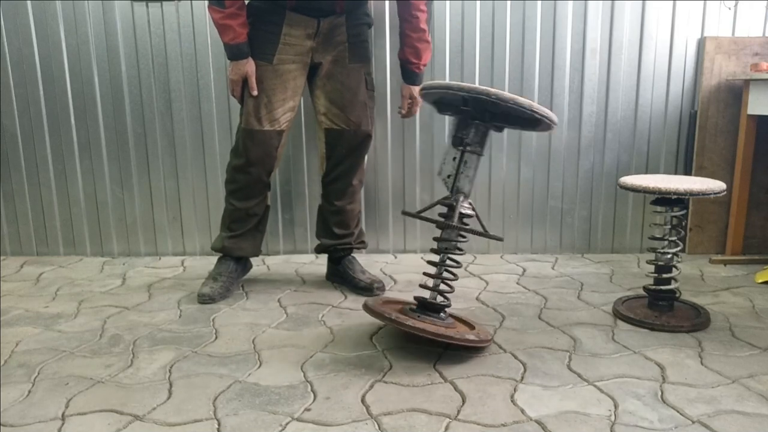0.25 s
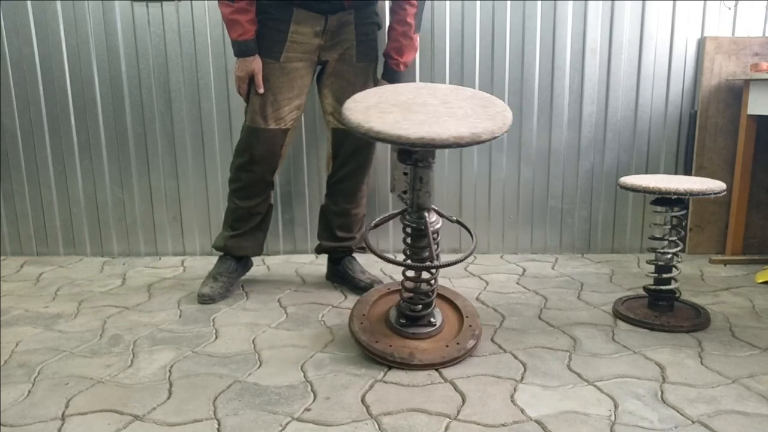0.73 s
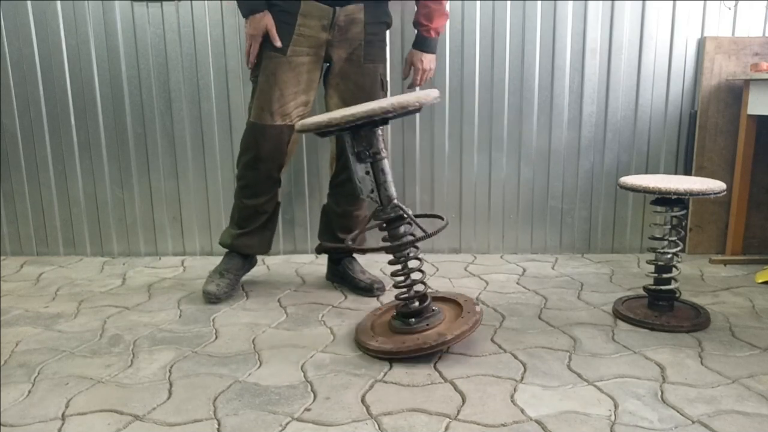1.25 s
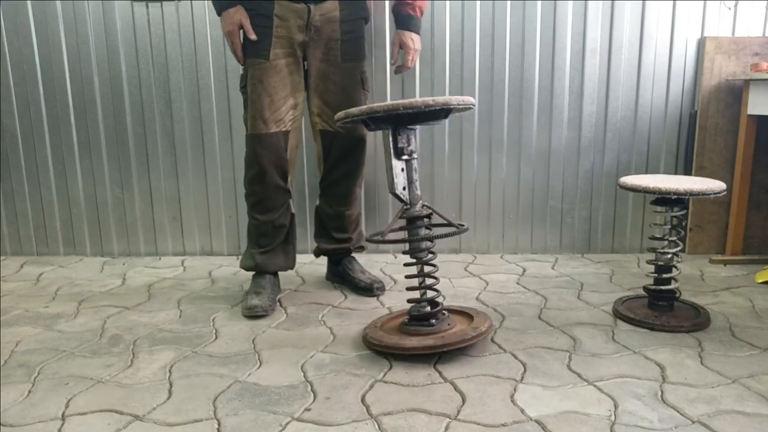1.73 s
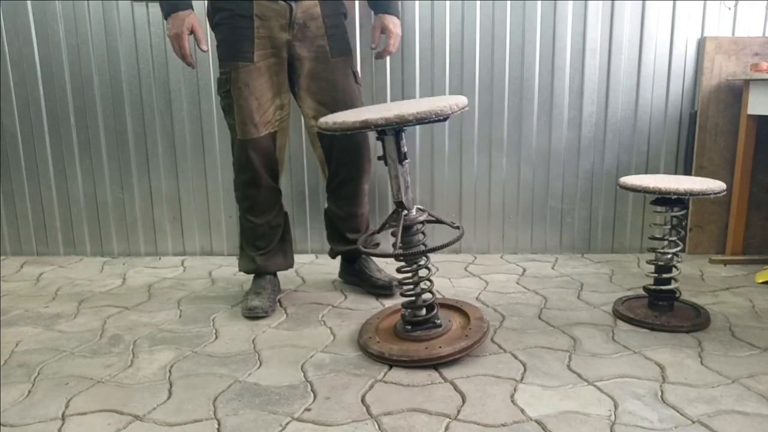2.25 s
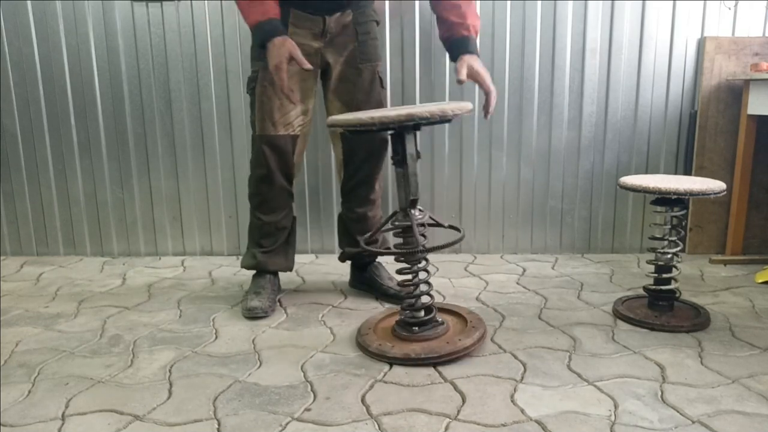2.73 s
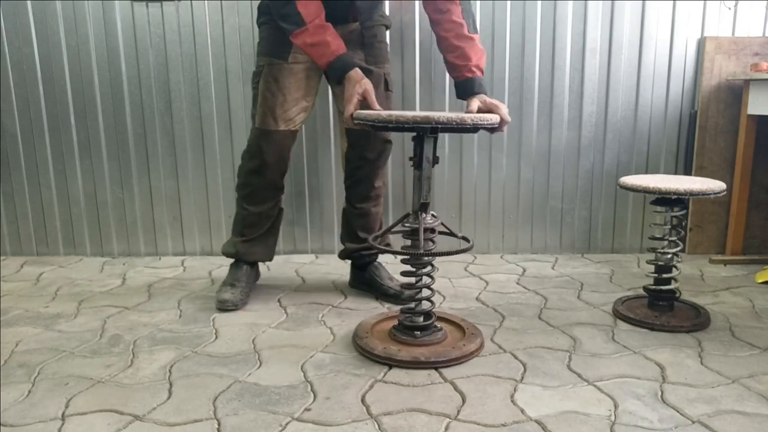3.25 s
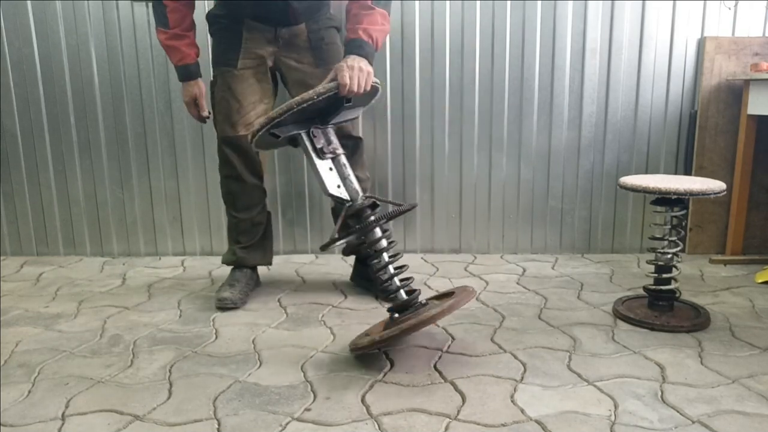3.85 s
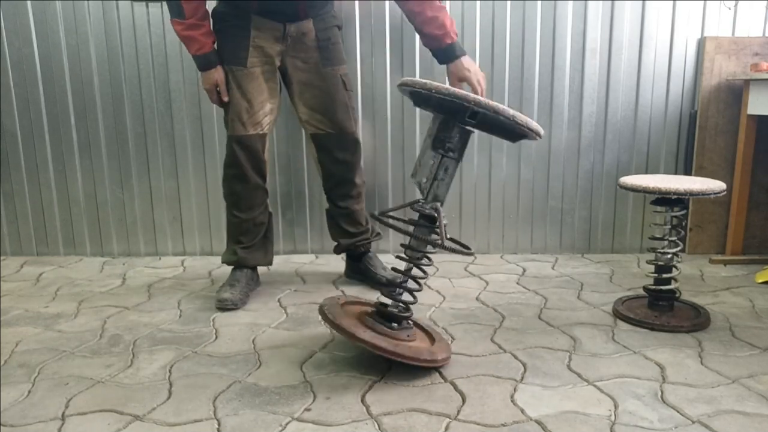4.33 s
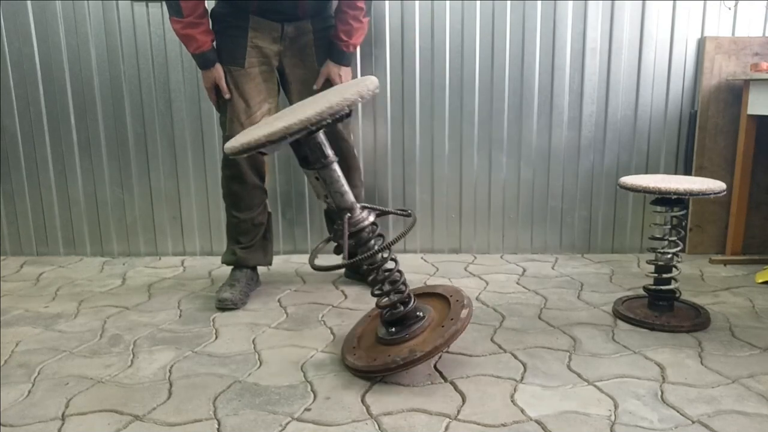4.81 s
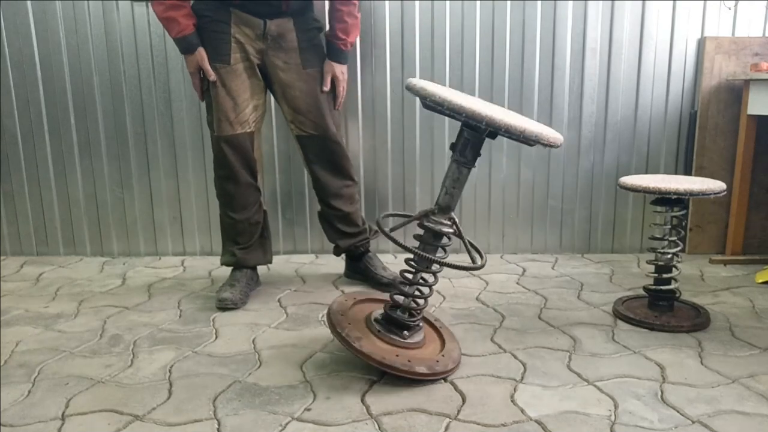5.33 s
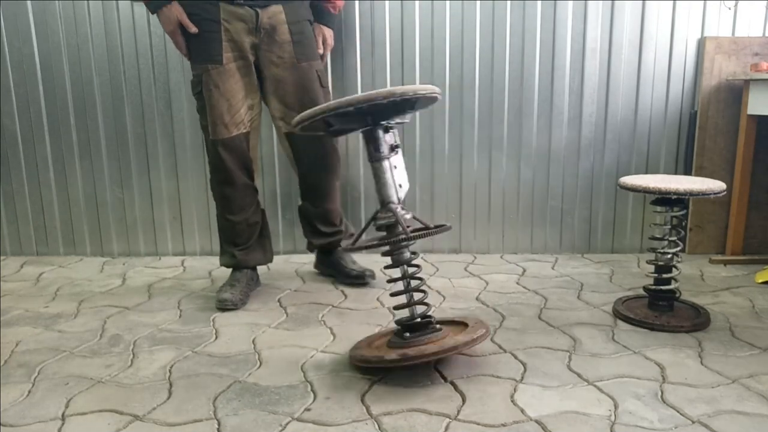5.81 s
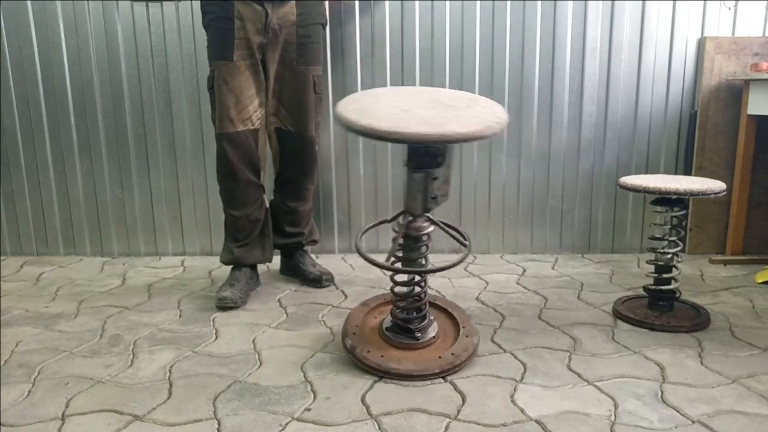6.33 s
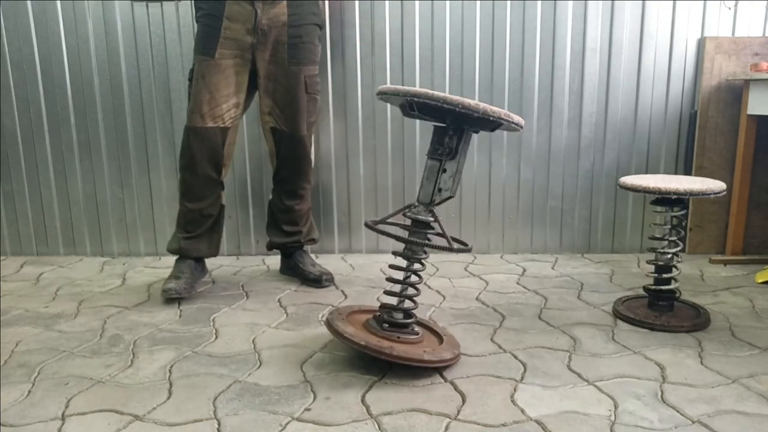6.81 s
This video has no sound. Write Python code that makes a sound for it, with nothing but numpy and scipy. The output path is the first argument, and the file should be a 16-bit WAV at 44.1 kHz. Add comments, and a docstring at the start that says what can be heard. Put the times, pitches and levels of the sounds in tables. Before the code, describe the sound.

Steel rim on stone in a hard, echoing yard: irregular clanks and rapid stuttering bounces over grinding rolls. Around the middle there is a strong rumble, bright ringing knocks, then a brief quieter gap with gritty drags and spring clinks. The wobbling resumes with duller, hollow thuds and softer rolling to the end. Close, single-channel pickup, with crisp stony cracks over a thick tail and very faint ambient noise.

```python
"""A paved yard with sheet-metal walls: a tall stool on a rusty steel disc is tipped and wobbles on its rim.
The rim rumbles over rough concrete pavers, knocks at the joints and drags sand; the coil spring above clinks.
Bumps and blows are noise grains and clicks sent through the steel's resonances; blows also ping decaying sines.
The yard, a dense tail that shifts as the contact circles, holds the sound for most of a second.
Some clacks, clinks and pings reach the microphone straight, over a faint far background of filtered noise."""
import sys
import numpy as np
from scipy import signal
from scipy.fft import rfft, irfft, next_fast_len
from scipy.io import wavfile
from scipy.ndimage import uniform_filter1d, minimum_filter1d

SR = 44100
rng = np.random.default_rng(int(sys.argv[2]) if len(sys.argv) > 2 else 0)


def waveform_to_disk(signal):
    """Save audio, clipped to [-1, 1], as 16-bit WAV at the path in sys.argv[1]."""
    frames = np.transpose(np.atleast_2d(signal))
    scaled = np.clip(frames, -1, 1) * 32767
    samples = np.round(scaled).astype(np.int16)
    wavfile.write(sys.argv[1], SR, samples)


N = 311346

# The rim drops into a joint once. Each row: start in seconds, force in dB, hardness in dB per octave,
# peak height of the stony crack (linear, 0-2), ring in dB before the mix.
JOINT_KNOCKS = [(0.003, -13.5, -0.5, 0, -43), (0.355, -22.5, -2, 0, -52.5), (0.433, -11.5, 1.3, 0.7, -50),
                (0.479, -13, 4, 1.5, -26.5), (0.553, -8.5, 3, 0, -28.5), (1.11, -24, 7.5, 1, -42),
                (1.16, -13.5, 5, 0, -46), (1.225, -11.5, -0.5, 0, -50), (1.6, -19, 4.5, 0.96, -21.5),
                (1.7, -20, 5.5, 0.19, -38), (1.991, -15.5, 3.5, 0.3, -36.5), (2.231, -13, 6, 0.84, -32.5),
                (2.257, -11.5, -0.5, 1.2, -46), (2.32, -10, 2.4, 1.4, -42), (2.585, -14, 8.5, 0, -27.5),
                (2.688, -28, -1, 0.51, -35), (3.082, -21, 7.5, 0.46, -30), (3.368, -15, -6.5, 0.44, -39),
                (3.377, -13, 9, 0.26, -19.5), (3.44, -34, 11.5, 0, -40), (3.497, -30.5, 13, 0.11, -53),
                (3.956, -39, -12, 0.022, -62), (4.117, -29, -8.5, 0, -54), (4.44, -20.5, -4.5, 0, -63),
                (4.692, -12, -2, 0.1, -33.5), (4.745, -18, -11, 0.22, -46), (4.997, -25, -7.5, 0, -50),
                (5.157, -23.5, 0.5, 0.054, -42), (5.227, -14, -6, 0.33, -45), (5.328, -18, 0, 0, -52.5),
                (5.432, -9.5, -2.5, 0.38, -44), (5.635, -14, -5.5, 0.13, -37),
                (5.893, -19.5, 4, 0.011, -37.5), (6.181, -27.5, 2, 0.23, -50),
                (6.399, -18, -3.5, 0.22, -55), (6.577, -23.5, -5, 0, -68), (6.685, -26.5, -1.5, 0.16, -49),
                (6.767, -20, -6.5, 0.2, -49), (6.952, -24, 2.5, 0, -50), (6.989, -19, -2.5, 0.084, -50),
                (7.031, -15.5, 0.5, 0.0044, -35)]
# The rim trips on a joint and strikes three times. Each row: first strike in seconds, force in dB,
# hardness in dB per octave, peak height of the stony crack (linear, 0-2), ring in dB before the mix.
JOINT_CLATTERS = [(0.918, -10.5, 3, 0.05, -33), (1.49, -9.5, 2.5, 0.34, -34),
                  (2.542, -13.5, -0.5, 0.092, -39), (2.974, -15.5, 0, 0.3, -35), (5.948, -16, 0, 0.91, -46)]
# The rim runs over the stone, swelling and fading.
# Each row: peak in seconds, force in dB, half-length in seconds.
ROLLING_RUNS = [(0.02, -21.5, 0.053), (0.62, -14, 0.068), (1.03, -15.5, 0.076), (1.29, -15.5, .12),
                (1.87, -16, 0.1), (2.35, -20, .1), (2.87, -11, 0.18), (3.07, -19, 0.05), (3.5, -31.5, 0.16),
                (4.55, -23.5, 0.091), (4.83, -30.5, 0.25), (5.4, -20.5, 0.06), (5.68, -16.5, 0.11),
                (6.07, -22, 0.13), (6.42, -23, 0.25), (7.04, -19.5, 0.089)]
# Hardness of the rolling contact: bright while the stool wobbles nearly upright, dull once it leans far.
# Each row: time in seconds, hardness in dB per octave.
ROLLING_HARDNESS = [(0, 1.5), (1.3, 3.5), (1.9, -2), (2.35, 6.5), (2.9, 1), (3.15, 8), (3.9, -4), (5.7, -5),
                    (6.1, 1), (6.5, -11), (7.05, -5.5)]
# The rim slides and drags sand. Each row: peak in seconds, level in dB before the mix, half-length in seconds.
SAND_SWISHES = [(0.56, -48, 0.073), (1.25, -39.5, 0.25), (2.33, -43.5, 0.06), (2.95, -38.5, 0.24),
                (3.42, -38, 0.058), (4.125, -28.5, 0.053), (4.63, -37, 0.14), (5.66, -38.5, 0.073),
                (6.51, -32, 0.14)]
# The spring touches its post. Each row: start in seconds, level in dB before the mix.
SPRING_CLINKS = [(1.803, -49), (2.262, -44), (3.355, -47.5), (3.835, -51), (4.064, -56), (4.14, -40.5),
                 (4.212, -34.5), (5.159, -40.5), (5.432, -38), (5.948, -41)]
# The disc's purest modes, pinged by every blow. Each row: frequency in Hz, level in dB relative to the ring.
DISC_PINGS = [(1700, 0), (2620, 1), (3990, -17), (4650, -23.5)]
# Resonances of disc and frame. Each row: frequency in Hz, width in Hz, full lift in dB.
STEEL_MODES = [(106, 9.3, 0), (205.5, 23, 4), (276.4, 22, 3.5), (391, 19, -1.5), (450.7, 34.5, 11.5),
               (490.9, 17.7, 11), (543.4, 39, 5.5), (645.4, 27.4, 9), (876.5, 207, 8.5), (982, 62, 4.5),
               (1106, 26, -1.5), (1285, 72, -1), (1594, 216, 5.5), (1650, 460, 4.5), (2556, 120, 9.5),
               (2625, 60, 12.5), (2736, 94, 10.5), (3944, 130, 12), (4600, 60, 2), (4590, 54, 9),
               (5605, 89, 13.5), (6730, 320, 12), (7350, 200, 16), (9040, 390, 4), (13200, 300, -0.5),
               (14900, 200, 13.5)]
# Broad colour of rim on stone. Each row: frequency in Hz, relative level in dB per Hz.
RIM_COLOUR = [(25, -45), (48, -38), (70, -17), (100, -5.5), (200, -3), (400, 4.5), (600, 0), (750, -3.5),
              (1100, -2.5), (1380, -13), (1800, -13), (2250, -28.5), (3100, -35.5), (4500, -39),
              (5300, -54), (9000, -75), (16000, -103.5)]
# Broad colour shared by sand and spring. Each row: frequency in Hz, relative level in dB per Hz.
SAND_COLOUR = [(60, -30.5), (400, -11), (1400, 7.5), (2500, -1.5), (3300, 5), (4600, 4), (5300, -5.5),
               (6400, 2), (7500, 0), (8400, -4), (8800, -24.5), (11000, -26), (12200, -12), (16000, -17)]
# Ring-on of steel and yard. Each row: frequency in Hz, seconds to fall 60 dB.
YARD_RING_ON = [(80, 1), (210, 0.59), (560, 0.59), (1500, 0.78), (2600, 0.84), (4000, 0.36), (10000, 0.44),
                (16000, 0.87)]
# Colour of the far background. Each row: frequency in Hz, relative level in dB per Hz.
BACKGROUND_COLOUR = [(20, -17.5), (60, -5), (110, 7), (300, 4), (1000, -10), (4000, -21.5), (16000, -46.5)]

CREEP_DB = -44  # force of the rim between runs
SWELL_DROP_DB = 4.5  # fall of a run or a swish one half-length from its peak
HINGE_HZ, BASS_TILT_SHARE = 600, 0.43  # hardness tilts about the hinge, with this share of its slope below it
BOUNCE_S, BOUNCE_LOSS_DB, BOUNCE_HARDENS = .0445, 0.84, 1.94  # per strike: gap, dB lost, dB per octave gained
CRACK_HZ, CRACK_T60_S = 1040, .007
SAND_UNDER_RIM_DB, SAND_CREEP_DB = -27.5, -52  # before the mix: relative to the rolling force; constant part
PING_SCATTER = .015  # standard deviation of the disc's pitch from blow to blow, as a share
# The spring's thud: dB relative to the force, and dB gained per dB-per-octave of softness.
THUD_HZ, THUD_DB, THUD_PER_SOFTNESS = 103.3, -26.5, 1.72
SPRING_DIRECT_DB = -7.5  # the clink heard straight, without the yard
WOBBLES_PER_S = 1.3
CUTOFF_HZ = 15800


def rim(force_db, hardness):
    """Rolling bumps and knocks drive the disc; a harder contact tips its spectrum towards the treble."""
    times, knock_db, knock_hardness, _, _ = strikes()
    bumps = grains(per_s=320, spread_db=4.0) * clumps(depth_db=5.0)
    touches = chatter(len(times), gap_s=.003)
    size = next_fast_len(N + SR // 10)
    hz = np.fft.rfftfreq(size, 1 / SR)
    spectrum = 0
    centres = HINGE_HZ * 2. ** np.arange(-1.5, 3)
    for centre in centres:
        octaves = np.log2(centre / HINGE_HZ)
        octaves = max(octaves, BASS_TILT_SHARE * octaves)  # gentler slope below the hinge
        rolling = bumps * from_db(force_db + hardness * octaves)
        knocking = blows(times, knock_db + knock_hardness * octaves, touches)
        spectrum = spectrum + rfft(rolling + knocking, size) * octave_share(hz, centre, centres)
    force = irfft(spectrum, size)[:N]
    return convolve(force, body(RIM_COLOUR, ringing=1.0))


def strikes(count=3):
    """Every landing of the rim, single or bouncing: times, force dB, hardness, crack height, ring dB."""
    bounces = []
    for s, db, hardness, crack, ring_db in JOINT_CLATTERS:
        for k in range(count):
            bounces.append((s + k * BOUNCE_S, db - k * BOUNCE_LOSS_DB,
                            hardness + k * BOUNCE_HARDENS, crack, ring_db))
    return np.transpose(bounces + list(JOINT_KNOCKS))


def cracks():
    """Steel landing squarely on stone gives a clack of only a few cycles."""
    times, _, _, height, _ = strikes()
    t = np.arange(SR // 20) / SR
    decay = np.exp(-np.log(1000) * t / CRACK_T60_S)
    onset = 1 - np.exp(-t / .0005)
    clack = np.sin(2 * np.pi * CRACK_HZ * t) * decay * onset
    return convolve(impulses(times, height), clack / np.abs(clack).max())


def pings(t60_s):
    """Each blow pings the disc's ring and the spring's thud: sines that swell for a few cycles and decay."""
    t = np.arange(SR // 2) / SR
    out = np.zeros(N + SR)
    decay = np.exp(-np.log(1000) * t / t60_s)
    for s, force_db, hardness, _, ring_db in strikes().T:
        shift = 1 + PING_SCATTER * rng.standard_normal()  # pitch varies with the point of contact
        thud = (THUD_HZ, force_db + THUD_DB - THUD_PER_SOFTNESS * hardness)
        ring = [(hz * shift, ring_db + db) for hz, db in DISC_PINGS]
        start = max(round(s * SR), 0)
        for hz, db in [thud] + ring:
            onset = 1 - np.exp(-hz * t / 2)
            ping = unit_energy(np.sin(2 * np.pi * hz * t) * onset * decay)
            out[start:start + len(t)] += from_db(db) * np.sqrt(SR / 20) * ping
    return out[:N]


def sand(sand_db):
    """Grains crushed and dragged under the rim hiss through the upper resonances."""
    crushed = grains(per_s=2700, spread_db=5.5) * clumps(depth_db=3.5)
    return convolve(crushed * from_db(sand_db), body(SAND_COLOUR, ringing=0.73))


def spring():
    """The coil rattles on its post and rings the upper resonances more purely than sand does."""
    times, db = np.transpose(SPRING_CLINKS)
    rattles = blows(times, db, chatter(len(times), gap_s=.004))
    return convolve(rattles, body(SAND_COLOUR, ringing=1.0))


def body(colour, ringing, size=16384):
    """Response of the steel to one contact: a broad colour with the resonances standing on it."""
    hz = np.fft.rfftfreq(size, 1 / SR)
    peaks = sum(lift / (1 + (2 * (hz - f) / width) ** 2) for f, width, lift in STEEL_MODES)
    return unit_energy(causal(at_hz(colour, hz) + ringing * peaks))


def grains(per_s, spread_db):
    """Random tiny impacts of uneven size; rms 1."""
    heights = from_db(spread_db * np.minimum(rng.exponential(1, N), 4))
    signs = rng.choice([-1, 1], N)
    present = rng.random(N) < per_s / SR
    return unit_energy(heights * signs * present) * np.sqrt(N)


def clumps(depth_db, count=210):
    """Rough and smooth patches of stone follow each other about thirty times a second."""
    patches = np.interp(np.arange(N), np.linspace(0, N, count), rng.standard_normal(count))
    return unit_energy(from_db(depth_db * patches)) * np.sqrt(N)


def chatter(events, gap_s, count=5):
    """A blow is a burst of touches, each softer than the last: their delays (s) and signed shares."""
    gaps, signs = np.moveaxis(rng.random((events, 2, count)), 1, 0)
    delays = gap_s * 2 * (np.cumsum(gaps, axis=1) - gaps[:, :1])  # the first touch comes at once
    shares = unit_energy(from_db(-1.5 * np.arange(count)))
    return delays, np.sign(signs - .5) * shares


def blows(times, db, touches):
    """Bursts that carry the energy of a twentieth of a second at the given level."""
    delays, shares = touches
    heights = from_db(db)[:, None] * shares * np.sqrt(SR / 20)
    return impulses(times[:, None] + delays, heights)


def impulses(times, heights):
    """One click at each time."""
    out = np.zeros(N)
    positions = np.clip(np.round(times * SR).astype(int), 0, N - 1)
    np.add.at(out, positions, heights)
    return out


def swells(rows):
    """Gain of a set of bell-shaped swells that add in power."""
    t = np.arange(N) / SR
    power = 0
    for s, db, half in rows:
        bell_db = db - SWELL_DROP_DB * ((t - s) / half) ** 2
        power = power + from_db(np.maximum(bell_db, -200)) ** 2
    return np.sqrt(power)


def circling(x, count=4):
    """As the contact runs round the rim, the pattern of ring-on and reflections keeps changing."""
    angle = 2 * np.pi * WOBBLES_PER_S * np.arange(N) / SR
    out = 0
    for k in range(count):
        facing = np.maximum(np.cos(angle - 2 * np.pi * k / count), 0)
        response = uncoloured(yard(direct_share=0.12, build_up_s=0.00035))
        out = out + convolve(x * facing, response)
    return out


def yard(direct_share, build_up_s):
    """The direct sound, then a dense noise tail whose decay time depends on frequency."""
    t = np.arange(SR) / SR
    hz = np.fft.rfftfreq(SR, 1 / SR)
    centres = 80 * 2. ** np.arange(9)
    white = rfft(rng.standard_normal(SR))
    tail = 0
    for centre in centres:
        band = irfft(white * octave_share(hz, centre, centres), SR)
        tail = tail + band * from_db(-60 * t / at_hz(YARD_RING_ON, centre))
    share = np.clip(direct_share, .01, .9)
    response = np.sqrt(1 - share) * unit_energy(tail * (1 - np.exp(-t / build_up_s)))
    response[0] += np.sqrt(share)
    return response


def uncoloured(response, size=25):
    """Levels out chance peaks, so that a tail adds length but no pitch of its own."""
    power = uniform_filter1d(np.abs(rfft(response)) ** 2, size)
    correction = causal(-10 * np.log10(power + 1e-9))
    return unit_energy(signal.fftconvolve(response, correction)[:len(response)])


def background():
    """Far background: steady noise shaped by a broad colour alone, without resonances."""
    return convolve(rng.standard_normal(N), body(BACKGROUND_COLOUR, ringing=0))


def causal(db):
    """Minimum-phase response with the given dB at evenly spaced frequencies: nothing sounds early."""
    cepstrum = irfft(np.log(from_db(db)))
    half = len(cepstrum) // 2
    cepstrum[1:half] *= 2
    cepstrum[half + 1:] = 0
    return irfft(np.exp(rfft(cepstrum)))[:half]


def octave_share(hz, centre_hz, centres):
    """Overlapping triangles on a log axis that add up to one."""
    return at_hz(np.c_[centres, centres == centre_hz], hz)


def at_hz(points, hz):
    """A table read on a log-frequency axis."""
    table_hz, values = np.array(points).T
    return np.interp(np.log(np.maximum(hz, 1)), np.log(table_hz), values)


def in_time(rows):
    """A curve of (seconds, value) read at every sample."""
    s, values = np.transpose(rows)
    return np.interp(np.arange(N) / SR, s, values)


def convolve(x, response):
    """A sound passed through a response."""
    return signal.fftconvolve(x, response)[:N]


def unit_energy(x):
    """Scaled so that the squares add up to one."""
    return x / np.sqrt(np.sum(x ** 2) + 1e-20)


def from_db(db):
    """Decibels to gain."""
    return 10 ** (np.asarray(db) / 20)


def to_db(gain):
    """Gain to decibels."""
    return 20 * np.log10(gain)


def scene():
    """Rim, sand, spring and short pings sound through the yard; clacks, clinks and long pings arrive straight."""
    force = np.hypot(swells(ROLLING_RUNS), from_db(CREEP_DB))
    crushing = force * from_db(SAND_UNDER_RIM_DB)
    drag = np.sqrt(swells(SAND_SWISHES) ** 2 + crushing ** 2 + from_db(SAND_CREEP_DB) ** 2)
    clinks = spring()

    stool = rim(to_db(force), in_time(ROLLING_HARDNESS))
    stool = stool + from_db(-3.5) * sand(to_db(drag))
    stool = stool + from_db(4) * clinks
    stool = stool + from_db(-2) * pings(t60_s=0.072)

    straight = cracks() + from_db(SPRING_DIRECT_DB) * clinks + from_db(-9.5) * pings(t60_s=0.71)
    return (circling(stool) + straight + from_db(-45.5) * background())[None]


def record(dry):
    """A fast limiter rounds the loudest peaks, the deepest bass is shed, the rest clips; the treble is cut."""
    hold = SR // 700
    gain = np.minimum(1, 1.15 / (np.abs(dry) + 1e-9))
    gain = minimum_filter1d(gain, 2 * hold)
    gain = uniform_filter1d(uniform_filter1d(gain, hold), hold)
    bass_cut = signal.butter(2, 32, "high", fs=SR, output="sos")
    treble_cut = signal.ellip(10, .1, 80, CUTOFF_HZ, fs=SR, output="sos")
    limited = signal.sosfilt(bass_cut, dry * gain)
    return signal.sosfilt(treble_cut, np.clip(limited, -1, 1))


dry = scene()
out = record(dry)
waveform_to_disk(out)
```